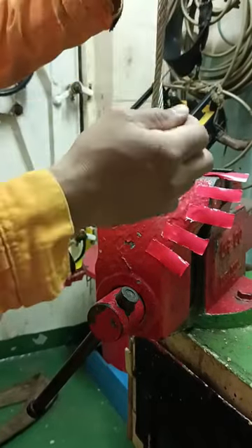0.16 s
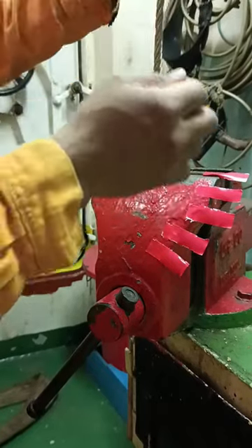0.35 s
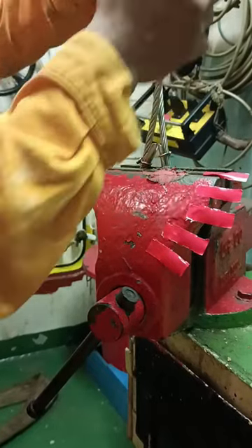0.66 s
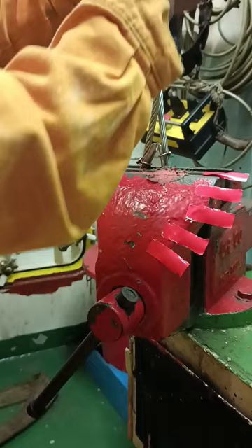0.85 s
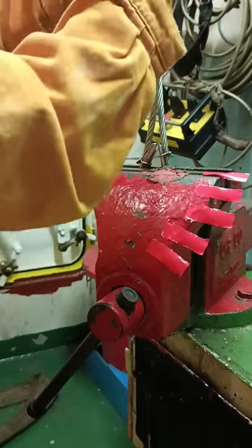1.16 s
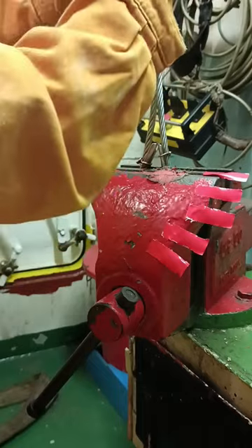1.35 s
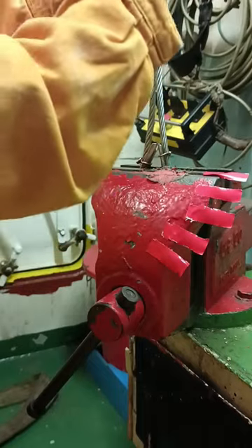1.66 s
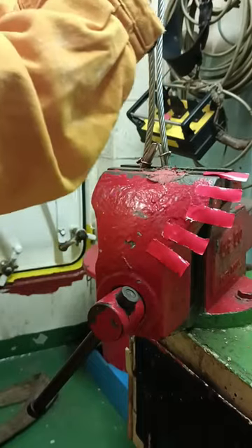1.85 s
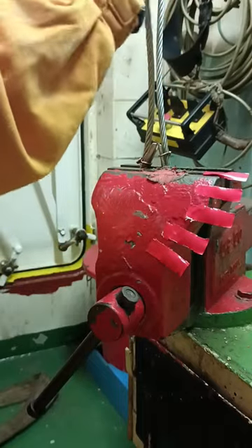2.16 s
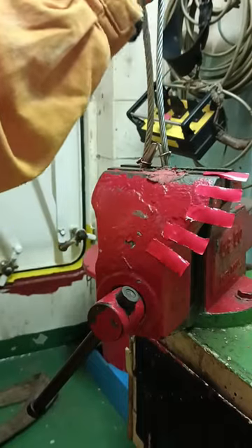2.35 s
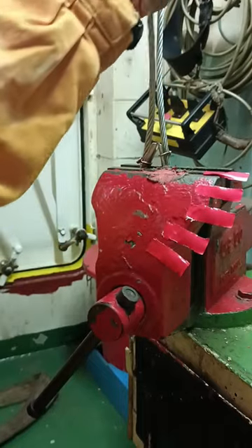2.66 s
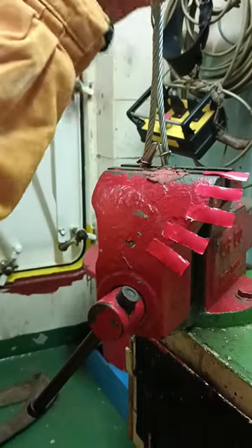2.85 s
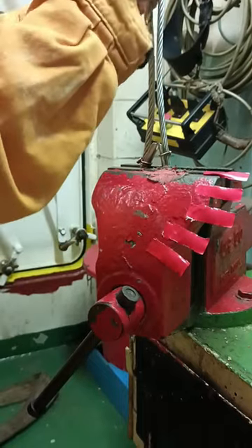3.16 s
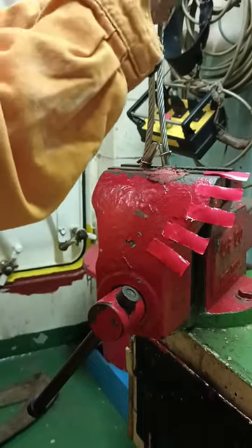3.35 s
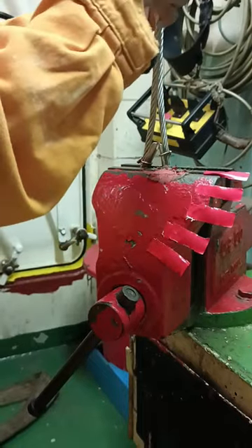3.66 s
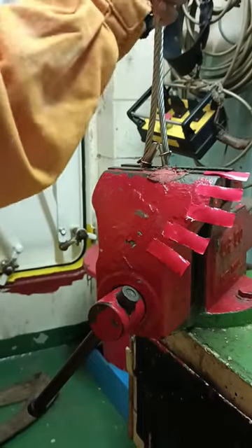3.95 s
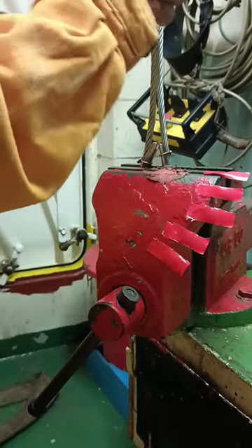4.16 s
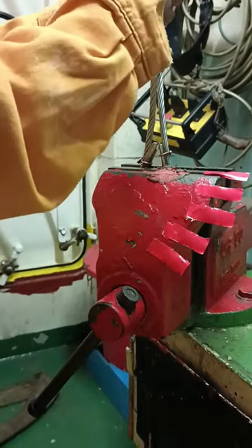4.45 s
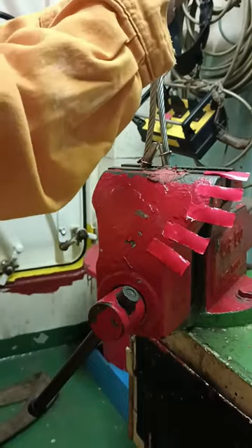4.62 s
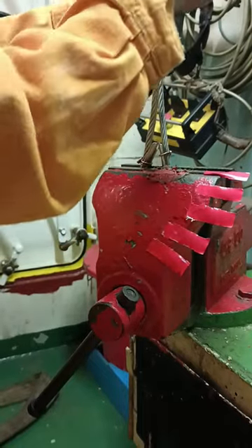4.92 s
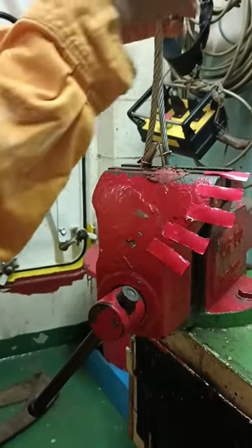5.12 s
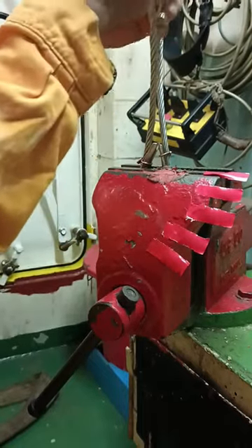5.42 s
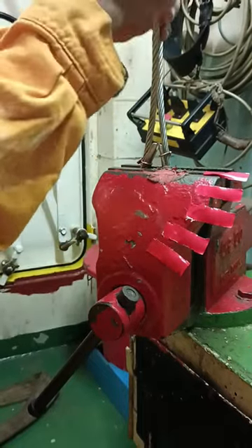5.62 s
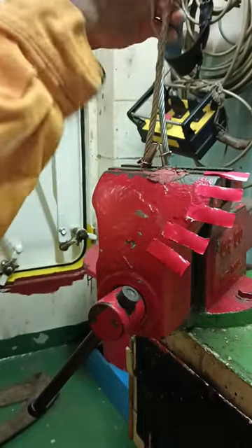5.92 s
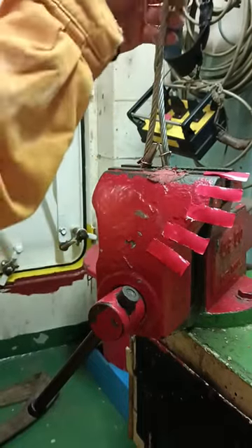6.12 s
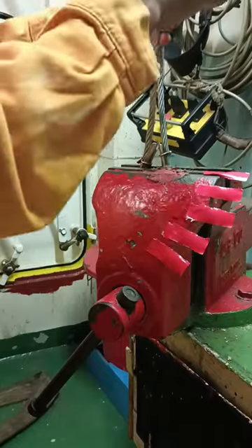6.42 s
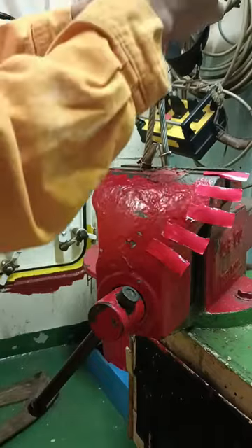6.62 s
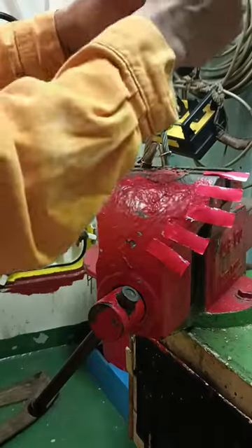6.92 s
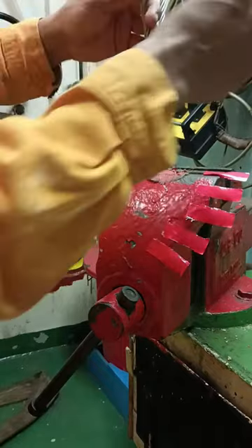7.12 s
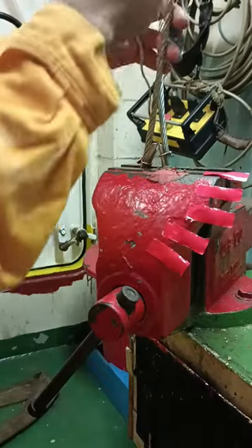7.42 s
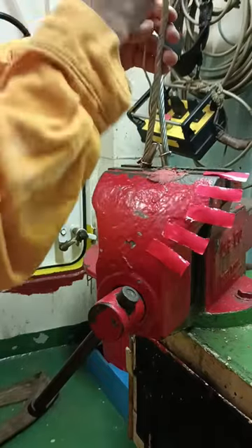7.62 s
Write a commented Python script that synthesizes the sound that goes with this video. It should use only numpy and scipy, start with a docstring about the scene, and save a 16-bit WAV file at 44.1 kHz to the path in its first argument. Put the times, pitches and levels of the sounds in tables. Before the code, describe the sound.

Loud ship engine room with deep diesel throb, shaking steel hull, motor hum and rushing air, plus a few faint bright wire scrapes.

```python
"""A ship's engine room, heard on a phone's two microphone ports beside a workbench vice.
From the first second a diesel throbs on multiples of its shaft speed and shakes the steel hull, filtered noise.
Motors hum in beating pairs, fans whine in fluttering tones, a casing rings and air rushes between the bulkheads.
The air flow sinks slightly, then is stronger from about 4 s on.
From 4 s a wire rope worked by hand in the vice scrapes faintly four times, in short bursts of bright grains."""
import sys
import numpy as np
from scipy import signal
from scipy.fft import rfft, irfft
from scipy.io import wavfile

SR = 44100
rng = np.random.default_rng(int(sys.argv[2]) if len(sys.argv) > 2 else 0)


def generate_wav(signal):
    """Clip the signal to [-1, 1] and save it as 16-bit WAV at the path in sys.argv[1]."""
    frames = np.transpose(np.atleast_2d(signal))
    scaled = np.clip(frames, -1, 1) * 32767
    pcm = np.round(scaled).astype(np.int16)
    wavfile.write(sys.argv[1], SR, pcm)


N = 343098
TIME = np.arange(N) / SR
FREQ = np.maximum(np.arange(N // 2 + 1) * SR / N, 1)
TOP_HZ = 15650  # upper limit of the phone


def undb(db):
    """Decibels to gain."""
    return 10 ** (np.asarray(db) / 20)


def unit(x):
    """Scale to rms 1."""
    return x / np.sqrt(np.mean(np.abs(x) ** 2, axis=-1, keepdims=True))


def along(table):
    """Columns of a table by frequency, joined on a log axis."""
    hz, *columns = np.transpose(table)
    return np.array([np.interp(np.log(FREQ), np.log(hz), column) for column in columns])


def white():
    """Spectra of two unrelated noises with a power of 1 per Hz."""
    return rfft(rng.standard_normal((2, N))) * np.sqrt(SR / 2)


def walk(rate_hz):
    """Smooth random wander of rms 1, up to about `rate_hz` turns a second."""
    smooth = np.exp(-(FREQ / rate_hz) ** 2 / 2)
    return unit(irfft(rfft(rng.standard_normal(N)) * smooth, N))


def tone(hz, scattered, rate_hz):
    """A steady line plus its reflections, whose sum swells and fades (complex, real part has rms 1)."""
    scattered = np.clip(scattered, 0, 1)
    echoes = unit(walk(rate_hz) + 1j * walk(rate_hz))
    strength = unit(np.sqrt(1 - scattered ** 2) + scattered * echoes)
    start_turn = rng.random()
    return np.sqrt(2) * strength * np.exp(2j * np.pi * (hz * TIME + start_turn))


def bulkheads(spectra, t60_s, share):
    """Steel walls comb the sound into close, narrow room modes, different at each port."""
    decay = undb(-60 * TIME / t60_s)
    tail = rfft(unit(rng.standard_normal((2, N)) * decay)) / np.sqrt(N)
    share = np.clip(share, 0, 1)  # part of the power that the modes shape
    return spectra * np.sqrt(1 - share + share * np.abs(tail) ** 2)


# How alike the two microphone ports hear the room:
# f/Hz, correlation [0-1], lag of the left port [rad]
PORT_LIKENESS = [(40, .999, 0), (120, .978, .1), (190, .89, 1.2), (260, .93, .1), (380, .94, .15),
                 (500, .45, 1.9), (660, .8, .7), (860, .35, 1.4), (1050, .58, 1.5), (1500, .3, 3),
                 (3000, .1, 6)]


def turbulence(table, t60_s, share):
    """Broad roar in the room: long waves reach both ports alike, short ones largely unrelated."""
    alike, lag = along(PORT_LIKENESS)
    alike = np.clip(alike, 0, 1)
    a, b = bulkheads(white(), t60_s, share)
    left = a * np.exp(-1j * lag)
    right = alike * a + np.sqrt(1 - alike ** 2) * b
    low_hz, high_hz = table[0][0], table[-1][0]
    edges = 1 / np.sqrt((1 + (low_hz / FREQ) ** 40) * (1 + (FREQ / high_hz) ** 40))
    return irfft(np.array([left, right]) * undb(along(table)) * edges, N)


# Lines of the diesel: multiple of the shaft speed, level/dB before the overall engine level
SHAFT_LINES = [(2, -14), (3, 1.5), (4, -18), (6, -18), (8, -19.5)]


def diesel(engine_db=-25.5, uneven_db=1.5):
    """Three firings a turn make the deep throb; unequal cylinders add other multiples of the shaft."""
    shaft_hz = 12.777
    throb = 0
    for multiple, db in SHAFT_LINES:
        throb = throb + undb(db) * tone(multiple * shaft_hz, 0.094, 3.3).real
    ports_db = np.array([[.4], [-.4]])
    return throb * undb(engine_db + uneven_db * walk(2.8) + ports_db)


# Hull and deck plates shaken by the machinery: f/Hz, left level/dB per Hz, right level/dB per Hz
HULL_RUMBLE = [(14, -66, -66), (20, -46, -50), (31.8, -46, -46), (73.3, -43, -45.5), (118.6, -46.5, -49),
               (139, -40.5, -45), (158.7, -40.5, -48.5), (189, -54.5, -56), (208.7, -54, -45.5),
               (221, -62, -53.5), (320, -58, -59), (391, -59.5, -65), (430, -59, -69), (456, -65, -73),
               (526, -77.5, -70)]


def hull():
    """Shaken steel plates rumble as low noise, ring between the bulkheads and waver a little."""
    return turbulence(HULL_RUMBLE, 1.15, 0.32) * undb(0.53 * walk(6.5))


# Hum of the main motor, pump and blower, each with a twin that runs a little slower:
# f/Hz, level/dB midway between ports, left minus right/dB, lag of the left port [rad], twin against it/dB
MOTOR_HUMS = [(166.9, -26.7, 6.6, .9, -22.5), (211.85, -35.5, -6.5, 0.92, -15.5), (381, -49, 4.2, .2, -2.5)]


def motors(scattered=0.15, waver_hz=1.7):
    """Each hum beats slowly against its twin, with its own level and phase at the two ports."""
    beats_hz, in_step_s = .64, 0.89  # beat rate, and a moment when the twins swell together
    slip = np.exp(-2j * np.pi * beats_hz * (TIME - in_step_s))
    hum = 0
    for hz, level_db, pan_db, lag, twin_db in MOTOR_HUMS:
        pair = 1 + undb(twin_db) * slip
        line = tone(hz, scattered, waver_hz) * pair * undb(level_db)
        left = undb(pan_db / 2) * line * np.exp(-1j * lag)
        right = undb(-pan_db / 2) * line
        hum = hum + np.array([left, right]).real
    return hum


# Whine of fan blades and gears, before the drift of the flow: f/Hz, left level/dB, right level/dB
FAN_WHINES = [(1028.1, -54, -56), (1324, -64, -62), (1855, -57, -62), (1931, -60, -56), (2906, -59, -60),
              (3352, -62, -63), (4080, -57, -50), (4175, -61, -62), (4549, -60, -64), (4779, -60, -64),
              (5023, -64, -60), (5191, -63, -60), (6686, -67, -76), (9507, -80, -65), (10341, -76, -65)]


def fans():
    """Blade and gear tones; the higher the tone, the faster it flutters, separately at each port."""
    scattered, flutter = .88, .0014  # flutter rate as a part of the tone's frequency
    whine = 0
    for hz, *ports_db in FAN_WHINES:
        ports = [undb(db) * tone(hz, scattered, flutter * hz).real for db in ports_db]
        whine = whine + np.array(ports)
    return whine


# Resonance of a machine casing: f/Hz, width of each of two equal stages [Hz], level/dB before flow and rattle
COVER_RING = (1876, 207, -46)


def casing(rattle_db=0.3):
    """A steel cover, shaken without pause, rings in one broad resonance."""
    hz, width_hz, db = COVER_RING
    resonance = 1 / (1 + 1j * (FREQ / hz - hz / FREQ) * hz / width_hz) ** 2
    shaking = bulkheads(white(), .45, .35)
    return unit(irfft(shaking * resonance, N)) * undb(db + rattle_db * walk(18))


# Air driven through the ventilation ducts, before the drift of the flow:
# f/Hz, left level/dB per Hz, right level/dB per Hz
DUCT_AIR = [(475, -71.5, -77), (570, -75.5, -71), (757, -68.5, -70), (930, -75.5, -73.5),
            (976, -70.5, -73.5), (1190, -75, -73), (1590, -74, -75), (2320, -77, -74), (3074, -71.5, -71),
            (3140, -79, -75), (3660, -72.5, -71.5), (5100, -74.5, -72.5), (5290, -70.5, -71.5)]
# Hiss of the turbocharger and grilles, before the drift of the flow:
# f/Hz, left level/dB per Hz, right level/dB per Hz
GRILLE_HISS = [(5780, -79.5, -75), (6530, -78, -82), (7220, -86.5, -84), (8280, -83.5, -77.5),
               (9200, -88, -83.5), (9500, -85.5, -76.5), (10350, -88, -78.5), (10740, -94, -81),
               (12160, -93.5, -86), (14000, -93, -95), (15500, -106, -92)]


def rushing_air():
    """Turbulent air roars in the ducts and hisses higher up, where the room rings more briefly."""
    return turbulence(DUCT_AIR, .3, .4) + turbulence(GRILLE_HISS, .12, .45)


# Drift of the air flow: t/s, level/dB
AIR_FLOW = [(0, -0.04), (2.2, -.5), (3.2, -0.2), (4, .5), (5.8, .5), (7.78, .2)]


def flow_drift_db():
    """Slow change of the flow level, joined by straight lines in dB."""
    return np.interp(TIME, *np.transpose(AIR_FLOW))


# Wire strands scrape past each other: start t/s, peak level/dB at the right port, length [s]
WIRE_SCRAPES = [(4.068, -49, .055), (5.829, -40, .05), (6.42, -38, .034), (7.075, -42, .032)]


def wire_rope(low_hz=8600, left_db=-9):
    """Strands catch and slip: short bursts of fine, bright grains, weaker at the left port."""
    rub = 0
    for start, db, length in WIRE_SCRAPES:
        age = np.maximum(TIME - start, 0) / (length / 3)
        rub = rub + undb(db) * age * np.exp(1 - age)  # peaks a third of the way in
    bright = 1 / np.sqrt((1 + (low_hz / FREQ) ** 8) * (1 + (FREQ / TOP_HZ) ** 20))
    grains = unit(irfft(white() * bright, N) * undb(4 * walk(300)))
    return grains * rub * undb([[left_db], [0]])


def scene():
    """All machines run at constant speed; the flow moves air and fans, and the casing about twice as far in dB."""
    flow_db = flow_drift_db()
    machines = diesel() + hull() + motors()
    ventilation = (fans() + rushing_air()) * undb(flow_db)
    return machines + ventilation + casing() * undb(2.1 * flow_db) + wire_rope()


def record(dry):
    """The phone cuts the top with a steep low-pass."""
    low_pass = signal.ellip(10, .1, 80, TOP_HZ, fs=SR, output="sos")
    return signal.sosfilt(low_pass, dry)


dry = scene()
out = record(dry)
generate_wav(out)
```